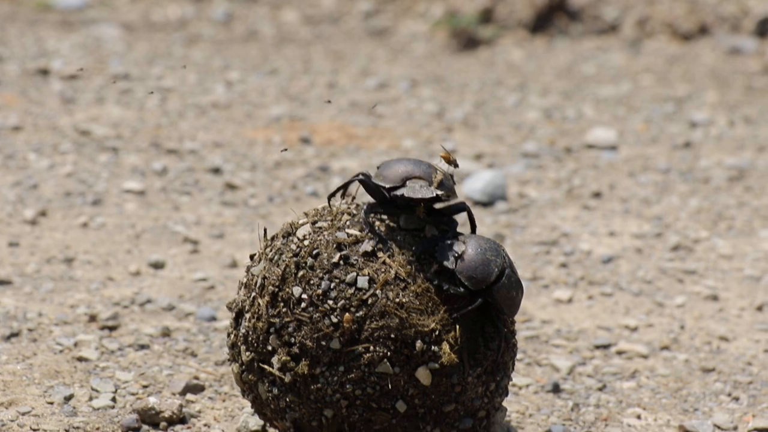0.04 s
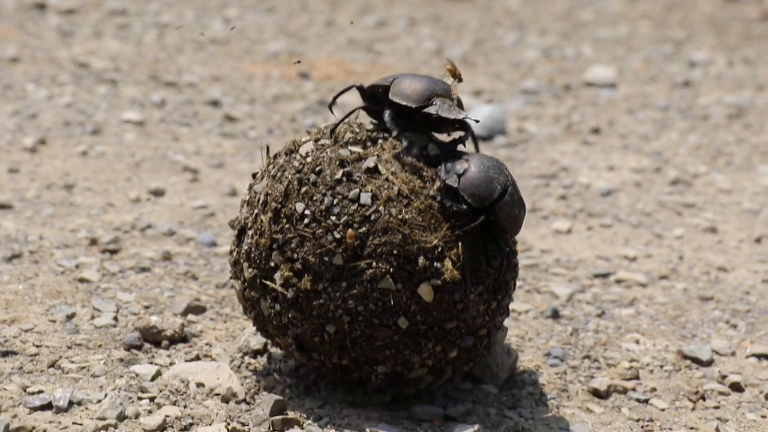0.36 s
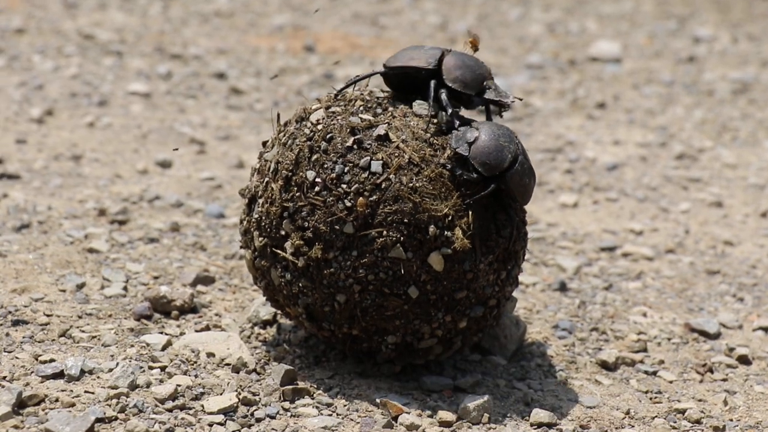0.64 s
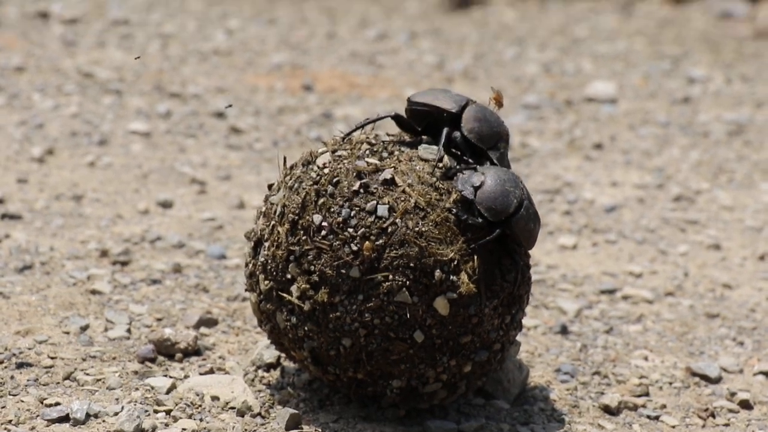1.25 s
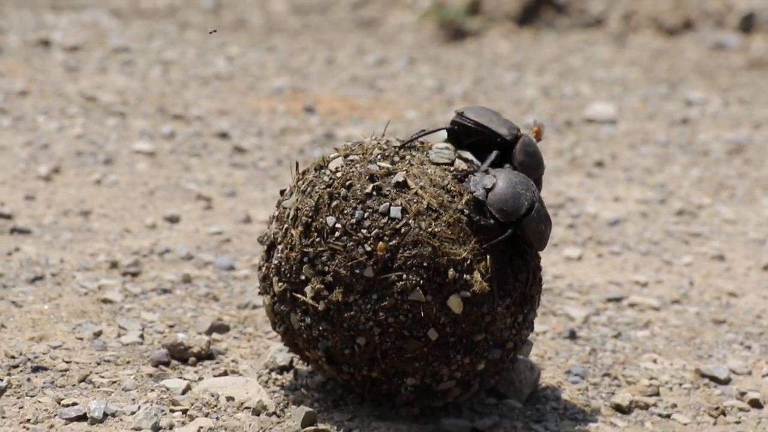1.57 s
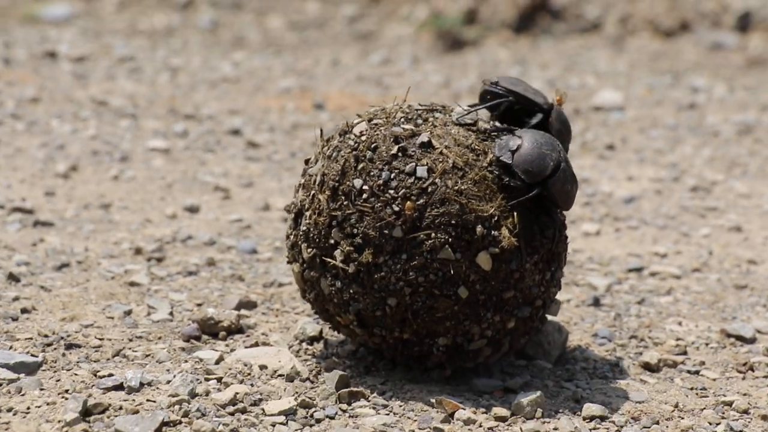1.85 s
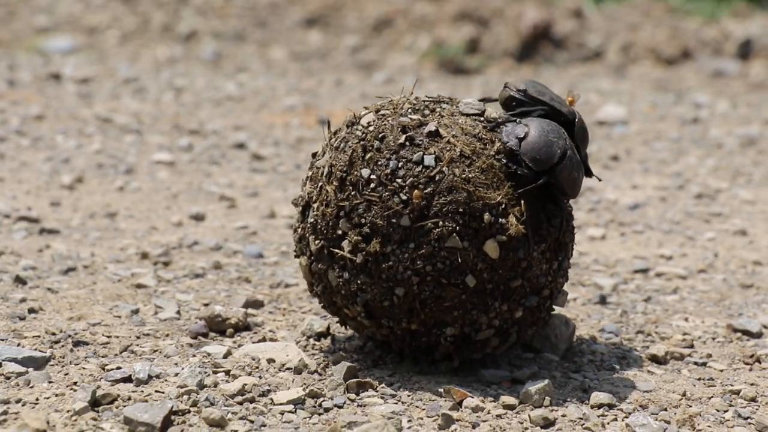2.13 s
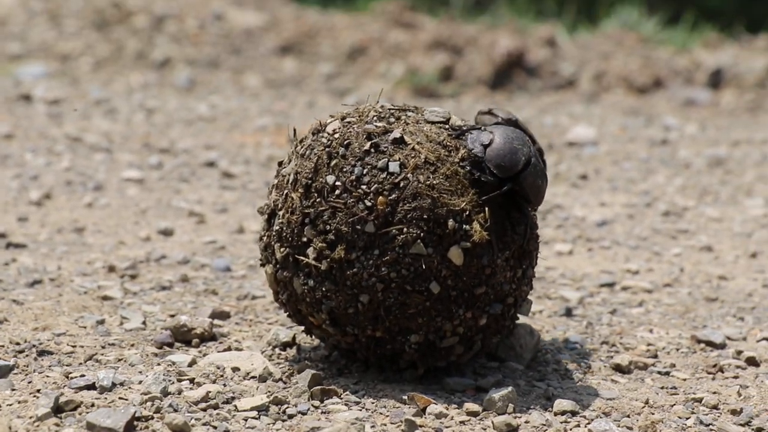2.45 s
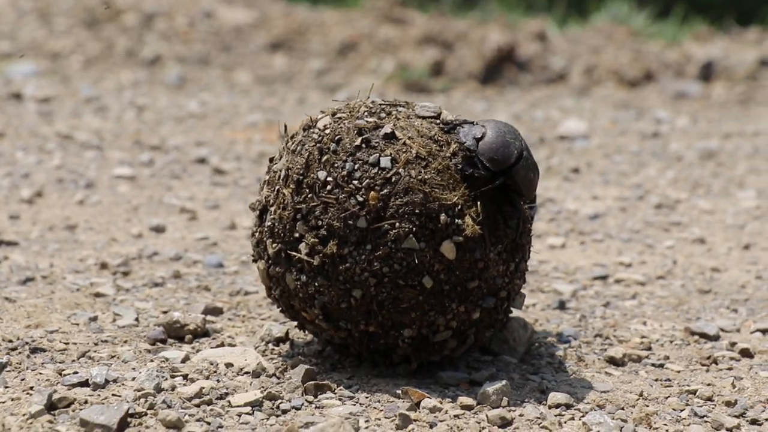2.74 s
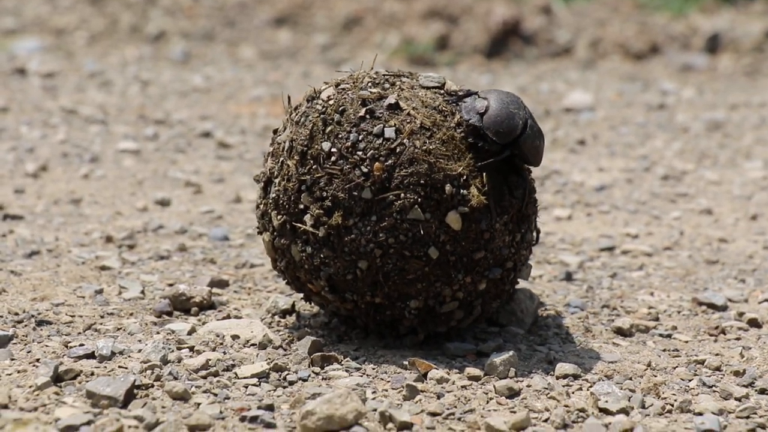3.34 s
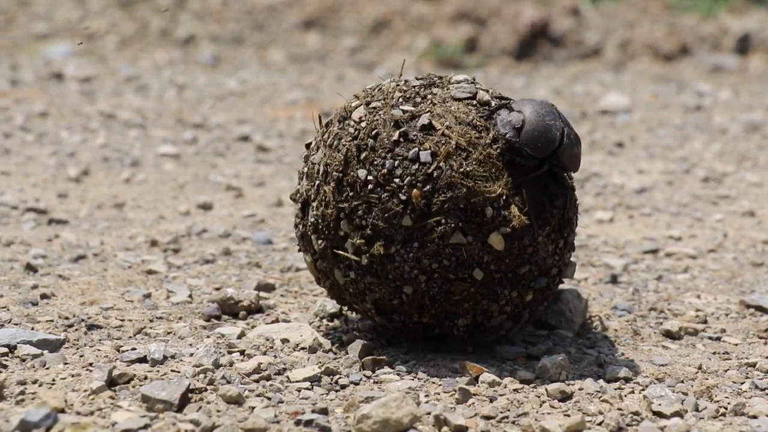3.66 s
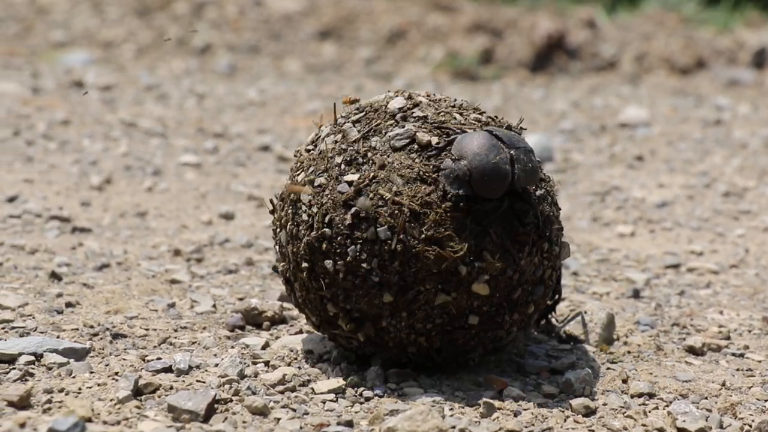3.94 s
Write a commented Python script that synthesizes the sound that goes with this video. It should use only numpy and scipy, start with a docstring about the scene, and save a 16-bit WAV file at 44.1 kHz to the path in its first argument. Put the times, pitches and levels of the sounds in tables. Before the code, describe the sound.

A vehicle idles some way off throughout, a steady low rumble outdoors, while crickets buzz very high. Light wind puffs the microphone at 0.2 and 2.8 seconds. Small hard clicks and scrapes come close by from 0.3 seconds, loudest at 1.8. Around 2.7 seconds one cricket swells briefly and a distant bird starts faint, thin chirps, ending in a trill of falling notes from 3.6 seconds.

```python
"""A dry gravel track in the sun, in mono. Throughout, a vehicle idles some way off and bush
crickets buzz high in the verge, their fast clicks ringing the wings. From 0.2 s light wind
puffs on the microphone, and something small and hard clicks and scrapes close by, loudest at
1.8 s. The nearest cricket swells briefly around 2.7 s, as a distant bird begins a few thin
slurred chirps; from 3.6 s the bird closes with a trill of falling notes."""
import sys
import numpy as np
from scipy import signal
from scipy.fft import rfft, irfft
from scipy.io import wavfile
from scipy.ndimage import uniform_filter1d

SR = 44100
rng = np.random.default_rng(int(sys.argv[2]) if len(sys.argv) > 2 else 0)


def wrap_up_sound(samples):
    """Save the sound to the file named by the first command line argument, as 16-bit audio."""
    columns = np.atleast_2d(samples).T
    # keep every value between -1 and 1, then stretch to whole-number steps
    tamed = np.clip(columns, -1, 1)
    steps = np.round(tamed * 32767).astype(np.int16)
    wavfile.write(sys.argv[1], SR, steps)


N = 176400
T = np.arange(N) / SR


def amp(db):
    """Decibels to gain."""
    return 10 ** (np.asarray(db) / 20)


def unit(x):
    """Scales to rms 1."""
    return x / np.sqrt(np.mean(x ** 2) + 1e-20)


def level(points):
    """Gain over time from (s, dB) points."""
    return amp(np.interp(T, *np.transpose(points)))


def add(mix, start_s, sound):
    """Mixes a sound in at start_s."""
    part = mix[max(round(start_s * SR), 0):][:len(sound)]
    part += sound[:len(part)]


def butterworth(x, order, edges_hz, kind):
    """Causal Butterworth filter."""
    return signal.sosfilt(signal.butter(order, edges_hz, kind, fs=SR, output="sos"), x)


def colour(x, points):
    """Minimum-phase filter from (Hz, dB) points; output rms 1."""
    points_hz, db = np.transpose(points)
    hz = abs(np.fft.fftfreq(N, 1 / SR))
    log_gain = np.log(amp(np.interp(np.log(hz + 1), np.log(points_hz + 1), db)))
    response = np.exp(np.conj(signal.hilbert(log_gain)))[:N // 2 + 1]
    return unit(irfft(rfft(x) * response, N))


def drift(rate_hz):
    """Random wander, mostly below rate_hz; rms 1."""
    hz = np.fft.rfftfreq(N, 1 / SR)
    return unit(irfft(rfft(rng.standard_normal(N)) * np.exp(-(hz / rate_hz) ** 2), N))


# Spectrum of idle and open air. Each row: frequency in Hz, relative density in dB.
RUMBLE_SPECTRUM = [(12, -45), (22, -11), (35, -27), (50, -15.5), (62, -18), (80, -14.5), (105, -6.5),
                   (150, -0.5), (178, -1), (212, -5), (235, -6), (265, 0.5), (295, -0.5), (325, 0.5),
                   (385, -2), (438, -3.5), (520, -1.5), (560, -0.5), (615, -11.5), (800, -9), (1000, -10),
                   (1130, -13), (1240, -17.5), (1650, -17.5), (2000, -25.5), (2200, -21), (2550, -28.5),
                   (3400, -32), (3900, -32.5), (4600, -36.5), (6000, -39.5), (7800, -42), (13200, -100)]
# Engine and fan tones. Each row: frequency in Hz, level in dB.
ENGINE_TONES = [(23.4, -75), (70, -59.5), (93.5, -51.5), (117, -53.5), (140.3, -52.5), (163.8, -54),
                (187, -56), (246.6, -47), (322, -53.5), (468, -58.5), (514, -51.5), (921, -60),
                (1163, -58.5), (1341, -67), (1713, -65), (2213, -67)]
RUMBLE_DB, RUMBLE_PATCH_DB = -35.5, 0.69
FIRING_HZ, THROB_DEPTH = 23.22, 0.15
WANDER_HZ_AT_400, WAVER_DB = 1.62, 2


def engine():
    """Rumble that shifts in the air and throbs at twice the firing rate, with wavering tones."""
    spectrogram = signal.stft(rng.standard_normal(N), nperseg=512)[2]
    patches = uniform_filter1d(rng.standard_normal(spectrogram.shape), size=8, axis=0)
    patches = unit(uniform_filter1d(patches, size=14, axis=1))
    air = signal.istft(spectrogram * amp(RUMBLE_PATCH_DB * patches), nperseg=512)[1][:N]
    throb = 1 + THROB_DEPTH * np.cos(2 * np.pi * 2 * FIRING_HZ * T)
    out = amp(RUMBLE_DB) * colour(air * throb, RUMBLE_SPECTRUM)
    for hz, db in ENGINE_TONES:
        wander_hz = WANDER_HZ_AT_400 * np.sqrt(hz / 400) * drift(6.04)
        turns = np.cumsum(hz + wander_hz) / SR + rng.random()
        out += amp(db) * unit(np.sin(2 * np.pi * turns) * amp(WAVER_DB * drift(4.1)))
    return out


def cricket(clicks_per_s, wander=.003, spread_db=(-2.4, 2.55)):
    """One singer: a fast, nearly regular train of uneven clicks."""
    turns = np.cumsum(clicks_per_s * (1 + wander * drift(3))) / SR + rng.random()
    clicks = np.diff(np.floor(turns), prepend=0)
    return unit(clicks * amp(rng.uniform(*spread_db, N)))


# Chorus singers. Each row: clicks per second, relative level in dB.
CHORUS_SINGERS = [(294.5, -10.5), (323.5, -10), (353, -17), (378, -10.5)]
# Chorus envelope. Each row: time in seconds, level in dB before the wing resonance.
CHORUS_ENVELOPE = [(0, -33), (.2, -33), (.5, -34.5), (.9, -34.5), (1.1, -34.5), (1.5, -34), (1.63, -35.5),
                   (1.85, -35), (2.0, -35.5), (2.25, -35), (2.45, -34), (2.75, -33), (3.1, -34.5),
                   (3.55, -35), (3.72, -34), (4, -34)]
# Nearest cricket's swell. Each row: time in seconds, level in dB before the wing resonance.
NEAR_ENVELOPE = [(2.2, -56), (2.42, -39), (2.65, -42), (2.75, -32.5), (2.87, -41), (3.15, -40), (3.5, -51),
                 (4, -50)]
# Broad wing resonance. Each row: frequency in Hz, relative gain in dB.
WING_SPECTRUM = [(3240, -64), (5500, -48), (6520, -29), (8000, -23.5), (9240, -15.5), (11300, -2),
                 (12200, 1.5), (13700, -3.5), (15600, -13.5)]
# Narrow peaks in the song. Each row: frequency in Hz, width in Hz, dB above the broad resonance.
SONG_PEAKS = [(6690, 75, 0), (8540, 120, 2), (10280, 110, 3.5), (10570, 70, 1.5), (10870, 36, 0),
              (11130, 76, 7)]
FAR_SINGERS_DB, CHORUS_FLICKER_DB = -1, 0.42
NEAR_CLICKS_PER_S, NEAR_HIGHPASS_HZ = 293.4, 9000


def crickets():
    """Several singers, a blur of far ones and a thinner one close by share one wing resonance."""
    chorus = sum(amp(db) * cricket(rate) for rate, db in CHORUS_SINGERS)
    chorus += amp(FAR_SINGERS_DB) * rng.standard_normal(N)
    near = butterworth(cricket(NEAR_CLICKS_PER_S), 4, NEAR_HIGHPASS_HZ, "high")
    flicker = amp(CHORUS_FLICKER_DB * drift(15))
    clicks = unit(chorus * flicker) * level(CHORUS_ENVELOPE) + near * level(NEAR_ENVELOPE)
    hz = np.fft.rfftfreq(N, 1 / SR)
    peaks = 1 + sum((amp(db) - 1) / (1 + 2j * (hz - peak_hz) / width_hz)
                    for peak_hz, width_hz, db in SONG_PEAKS)
    return np.std(clicks) * colour(irfft(rfft(clicks) * peaks, N), WING_SPECTRUM)


# Wind puffs. Each row: centre in seconds, half-width in seconds, level in dB.
WIND_PUFFS = [(.2, .05, -46.5), (.63, .025, -57), (2.83, 0.074, -50), (3.3, .04, -56)]


def wind(band_hz=(24, 70)):
    """Soft low puffs of air on the microphone."""
    buffet = unit(butterworth(rng.standard_normal(N), 2, band_hz, "band"))
    return buffet * sum(amp(db) * np.exp(-((T - centre_s) / half_width_s) ** 2)
                        for centre_s, half_width_s, db in WIND_PUFFS)


def ring(excitation, modes):
    """A struck body: damped modes of alternating sign."""
    t = np.arange(len(excitation)) / SR
    response = np.zeros(len(t))
    for k, (hz, width_hz, db) in enumerate(modes):
        decay = np.sqrt(width_hz) * np.exp(-np.pi * width_hz * t)
        response += (-1) ** k * amp(db) * decay * np.sin(2 * np.pi * hz * t)
    return signal.fftconvolve(excitation, response / np.linalg.norm(response))[:len(t)]


# Body modes: low ping, gritty middle, bright snap.
# Each row: frequency in Hz, width in Hz, relative level in dB.
PING_MODES = [(2127, 190, 0)]
GRIT_MODES = [(2690, 520, 0.22), (3880, 1200, -1.2)]
SNAP_MODES = [(6920, 780, 3), (8800, 1200, 0)]
# Handling clicks. Each row: start in seconds, ping, grit and snap levels in dB, decay in seconds.
HANDLING_CLICKS = [(0.28, -46, -45, -65, .003), (.284, -42, -43.5, -65, 0.0028),
                   (.362, -62, -60, -44, 0.0018), (.857, -52, -46, -55, 0.0023),
                   (1.7963, -43, -35, -47, .004), (1.8022, -32, -31, -39, 0.0028),
                   (1.8086, -25, -36, -45, 0.0018), (1.8111, -45, -38, -20.5, 0.00071),
                   (1.8138, -21.5, -23, -28, 0.001), (1.82, -43, -44.5, -63, 0.0081),
                   (1.914, -48, -44.5, -58, 0.0034), (2.1517, -28.5, -38, -45, .0015),
                   (2.3136, -33.5, -49, -70, 0.0019), (2.461, -37, -46, -62, 0.0022),
                   (3.4246, -53, -50, -44, 0.0022), (3.711, -55, -48, -47, 0.0037)]


def handling(rise_s=.0001, band_hz=(1280, 13000)):
    """Brief scrapes ring a small hard body, some with a bright snap."""
    out = np.zeros(N)
    t = np.arange(0, .06, 1 / SR)
    for start_s, ping_db, grit_db, snap_db, decay_s in HANDLING_CLICKS:
        envelope = np.exp(-t / decay_s) * (1 - np.exp(-t / rise_s))
        envelope_rms = np.sqrt(np.mean(envelope ** 2))
        for db, modes in ((ping_db, PING_MODES), (grit_db, GRIT_MODES), (snap_db, SNAP_MODES)):
            scrape = envelope * rng.standard_normal(len(t))
            add(out, start_s, amp(db) * envelope_rms * unit(ring(scrape, modes)))
    return butterworth(out, 4, band_hz, "band")


def whistle(hz):
    """Sine following a pitch curve."""
    return np.sin(2 * np.pi * np.cumsum(hz) / SR)


# Chirps. Each row: start in seconds, length in seconds, start and end pitch in Hz, level in dB.
BIRD_CHIRPS = [(2.710, 0.016, 4600, 6100, -53), (3.014, .023, 4400, 6600, -51.5),
               (3.316, 0.027, 4140, 7160, -51.5), (3.445, 0.034, 6600, 4700, -54),
               (3.558, .02, 4000, 3280, -53)]
# Closing trill. Each row: start in seconds, top pitch in Hz, level in dB.
TRILL_NOTES = [(3.600, 5340, -52), (3.669, 5400, -50), (3.735, 5500, -51), (3.807, 5450, -50.5),
               (3.869, 5760, -50), (3.928, 5640, -48.5), (3.992, 5370, -48)]
NOTE_S, NOTE_RAMP_S, NOTE_FADE_DB, NOTE_FALL_RATIO = 0.028, 0.0024, -13, 0.57


def bird():
    """Single slurred whistles, then a trill of quick falling notes."""
    out = np.zeros(N)
    for start_s, length_s, from_hz, to_hz, db in BIRD_CHIRPS:
        progress = np.arange(0, length_s, 1 / SR) / length_s
        arch = np.sqrt(abs(np.sin(np.pi * progress)))
        add(out, start_s, amp(db) * arch * whistle(from_hz * (to_hz / from_hz) ** progress))
    t = np.arange(0, NOTE_S, 1 / SR)
    ramps = np.minimum(np.minimum(t, NOTE_S - t) / NOTE_RAMP_S, 1)
    envelope = ramps * amp(NOTE_FADE_DB * t / NOTE_S)
    for start_s, top_hz, db in TRILL_NOTES:
        add(out, start_s, amp(db) * envelope * whistle(top_hz * NOTE_FALL_RATIO ** (t / NOTE_S)))
    return out


def distant(call, flutter_db=0.5, echo_db=-3, t60_s=0.52):
    """The path through air and scrub makes a call flutter and leaves a faint tail."""
    t = T[:SR // 2]
    tail = rng.standard_normal(len(t)) * amp(-60 * t / t60_s)
    echo = signal.fftconvolve(call, tail / np.linalg.norm(tail))[:N]
    return call * amp(-flutter_db * drift(200)) + amp(echo_db) * echo


def scene():
    """All sources, the same in both channels."""
    mono = engine() + wind() + crickets() + handling() + distant(bird())
    return np.tile(mono, (2, 1))


OPEN_S, LOWPASS_HZ = .0355, 15780


def record(dry):
    """The microphone opens just after the start; steep band limit."""
    lowpass = signal.firwin(801, LOWPASS_HZ, window=("kaiser", 9), fs=SR)
    return signal.oaconvolve(dry * (T >= OPEN_S), lowpass[None], "same")


dry = scene()
out = record(dry)
wrap_up_sound(out)
```